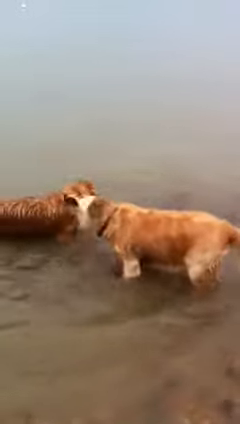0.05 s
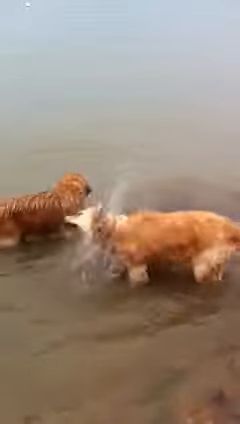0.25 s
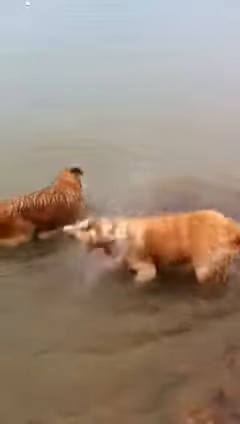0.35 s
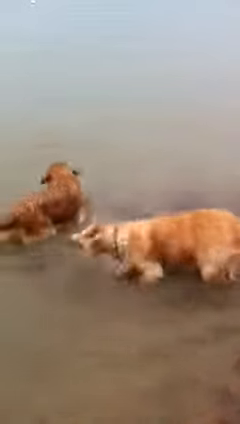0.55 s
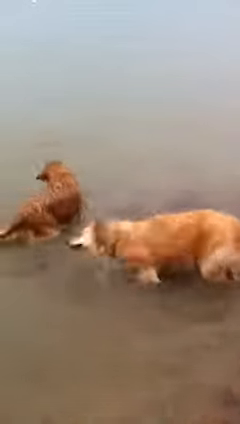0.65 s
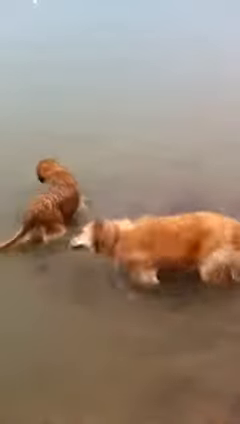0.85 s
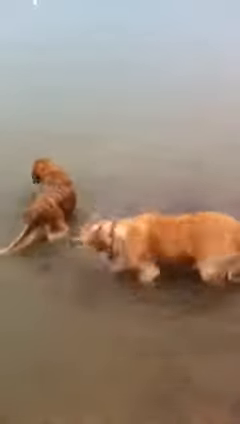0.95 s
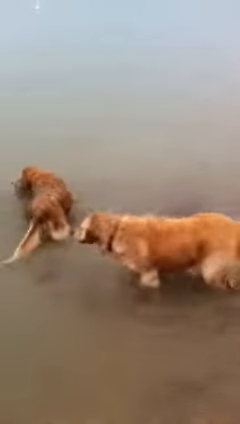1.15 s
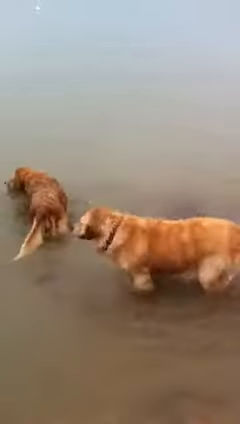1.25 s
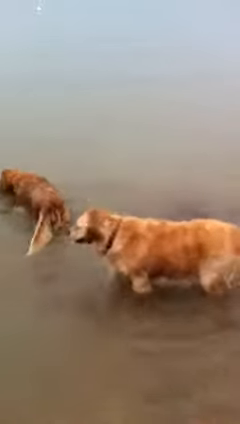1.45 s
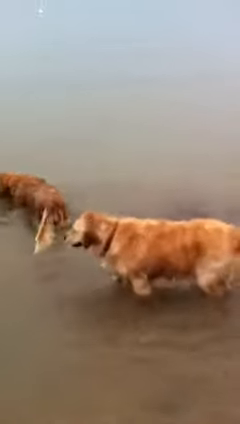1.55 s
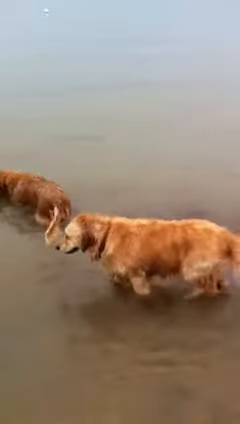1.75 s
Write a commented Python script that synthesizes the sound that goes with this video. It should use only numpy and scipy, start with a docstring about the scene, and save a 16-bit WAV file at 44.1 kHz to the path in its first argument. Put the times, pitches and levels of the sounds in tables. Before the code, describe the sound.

A wet dog shakes its head, ears slapping quickly and spray pattering onto water.

```python
"""A faint shore hiss, a far hum and a few drips, then a sheet of water flies off a wet dog's head.
The dog stands in shallow water a few metres away and shakes: its ears slap about ten times a second,
cracking on wet fur, ringing trapped air and flinging spray. The drops patter back on the water and
ring small bubbles. A faint tone sinks as the shower thins, and a last plop follows."""
import sys
import numpy as np
from scipy import signal
from scipy.fft import rfft, irfft
from scipy.io import wavfile
from scipy.ndimage import uniform_filter1d

SR = 44100
rng = np.random.default_rng(int(sys.argv[2]) if len(sys.argv) > 2 else 0)


def wrap_up_sound(samples):
    """Save the sound to the file named by the first command line argument, as 16-bit audio."""
    columns = np.atleast_2d(samples).T
    # keep every value between -1 and 1, then stretch to whole-number steps
    tamed = np.clip(columns, -1, 1)
    steps = np.round(tamed * 32767).astype(np.int16)
    wavfile.write(sys.argv[1], SR, steps)


N = 79380
TIME, FREQS = np.arange(N) / SR, np.arange(N // 2 + 1) * SR / N
IMPACT_RISE_S = 0.000085
DROPLETS_PER_S, DROPLET_SPREAD_DB = 7000, 2.5


def undb(db):
    return 10 ** (np.asarray(db) / 20)


def unit(x):
    """Scale to rms 1."""
    return x / np.sqrt(np.mean(x ** 2))


def db_at(eq, hz):
    """Read an EQ curve on a log frequency axis."""
    freqs, db = np.array(eq).T
    return np.interp(np.log(np.maximum(hz, 1)), np.log(freqs), db)


def fader(points):
    """Gain over time from points in seconds and dB."""
    return undb(np.interp(TIME, *np.array(points).T))


def colour(x, eq):
    """Shape x with an EQ curve, at rms 1."""
    return unit(irfft(rfft(x) * undb(db_at(eq, FREQS)), N))


def noise(eq):
    return colour(rng.standard_normal(N), eq)


def low_cut(x, hz):
    return signal.sosfilt(signal.butter(3, hz, "high", fs=SR, output="sos"), x)


def burst(peak_s, rise_s, decay_s):
    """Envelope that swells to a peak and dies away."""
    t = TIME - peak_s
    return np.exp(np.minimum(t / rise_s, -t / decay_s))


def clicks(per_s, spread_db):
    """Random clicks of uneven size."""
    hits = rng.random(N) < per_s / SR
    sizes = undb(spread_db * np.minimum(rng.exponential(size=N), 5))
    return hits * sizes * rng.choice([-1, 1], N)


def ring(out, start, hz, db, cycles, glide=0, swell=1 / (2 * np.pi)):
    """Add a short ring to out: a sine whose swell and 1/e decay are counted in cycles."""
    i = max(int(start * SR), 0)
    length = max(min(int(7 * cycles / hz * SR), N - i), 0)
    turns = np.arange(length) * hz / SR
    envelope = np.exp(-turns / cycles) * (1 - np.exp(-turns / swell))
    phase = 2 * np.pi * turns * (1 + glide * turns / hz / 2)
    out[i:i + length] += undb(db) * envelope * np.sin(phase)


# The shore's tone. Each row: frequency in Hz, gain in dB.
SHORE_EQ = [(25, -11), (55, -19), (85, -1.5), (125, 4), (220, 0.5), (320, -1), (600, -1), (1000, -31),
            (2200, -15), (6000, -39), (10000, -23), (16000, -15)]
# The far hum. Each row: centre in Hz, half-width in Hz, level in dB.
HUM_BANDS = [(122.8, 4.3, -72), (176.7, 8.1, -73), (215, 20.6, -71)]


def shore():
    """A steady bed of outdoor hiss, with narrow noise bands wavering as a far hum."""
    out = undb(-65.5) * noise(SHORE_EQ)
    for hz, width, db in HUM_BANDS:
        band = rfft(rng.standard_normal(N)) / (1 + ((FREQS - hz) / width) ** 2)
        out += undb(db) * unit(irfft(band, N))
    return out


# Drips, plops and, at 1.084 s, the bright smack of an ear's rebound. Each row: start in seconds,
# pitch in Hz, ring level in dB, decay in cycles, glide as a fraction of the pitch per second,
# tick level in dB.
WET_HITS = [(0.062, 6900, -59, 14, 6, -70), (0.067, 1378, -69, 25, 0, -75), (.1435, 6460, -57, 9, -2, -73),
            (.1620, 6100, -55, 11, 2, -70), (0.2623, 1320, -38.5, 2.7, 2, -41),
            (.4308, 6200, -33, 7.5, -3, -43), (0.489, 5900, -33.5, 8.8, 15, -48),
            (.4920, 1367, -48, 25, 1.5, -68), (0.523, 6300, -34.5, 8, 9, -40.5),
            (0.5348, 6500, -38, 7.8, 0, -56), (.6220, 1400, -52.5, 6.5, -11, -40.5),
            (.7270, 1440, -37, 4, 9, -46), (.7275, 905, -43.5, 3.7, -6, -60),
            (0.8832, 5800, -29, 3.8, 0, -42), (1.0840, 5150, -32, 5.2, 0, -38),
            (1.2260, 5300, -36, 5.4, -2, -46), (1.2660, 5000, -45, 6, 0, -45.5),
            (1.3150, 746, -42, 3.2, 8, -47), (1.3940, 9000, -44, 11, 4, -63),
            (1.4590, 9140, -40.5, 11, -5, -50), (1.4615, 856, -40, 12.6, 0, -44.5),
            (1.4725, 836, -47.5, 8.9, 1, -56), (1.4850, 724, -54, 8, -8.5, -64),
            (1.5060, 3600, -49, 10, -4, -60), (1.5460, 2300, -55, 8, 0, -66),
            (1.5480, 813, -55, 9.4, 3, -66), (1.623, 696, -53.5, 6, -8, -64),
            (1.6715, 2060, -51, 3.2, -6, -62), (1.6823, 1120, -56.5, 10, -2, -53)]
# The tick of each impact. Each row: frequency in Hz, gain in dB.
TICK_EQ = [(200, -17), (600, 2), (1500, -1), (3000, -1.5), (6000, 1.5), (9000, 0), (12000, -1),
           (16000, -11)]


def drops_and_rebound():
    """Each hit ticks and rings inside a ragged splash; in a drip or plop the ring is a bubble."""
    out, tick = np.zeros(N), noise(TICK_EQ)
    step = 2 ** 0.63  # splash width as a frequency ratio
    for start, hz, db, cycles, glide, tick_db in WET_HITS:
        ring(out, start, hz, db, cycles, glide)
        out += undb(tick_db) * burst(start, IMPACT_RISE_S, decay_s=0.0032) * tick
        splash_eq = [(hz / step**3, -45), (hz / step, -2), (hz, 0), (hz * step, -8), (hz * step**3, -45)]
        out += undb(db - 17) * burst(start + 1 / hz, rise_s=1 / hz, decay_s=9.6 / hz) * noise(splash_eq)
    return out


# The opening swell of water. Each row: time in seconds, level in dB.
SHEET_FADER = [(.17, -70.5), (.205, -51), (.236, -44), (.268, -45), (.295, -66), (.32, -90)]
# Its bright tone. Each row: frequency in Hz, gain in dB.
SHEET_EQ = [(200, -26), (600, -2.5), (1300, -6), (3000, -3), (4500, 0.5), (6600, 4.5), (8000, -1),
            (9500, -0.5), (12000, -4.5), (16000, -5.5)]


def sheet():
    """The first sheet of water leaves the head in a dense rush of droplet clicks."""
    return colour(clicks(DROPLETS_PER_S, DROPLET_SPREAD_DB), SHEET_EQ) * fader(SHEET_FADER)


# Water churned by the shower. Each row: time in seconds, level in dB.
CHURN_FADER = [(0, -73.5), (.19, -68.5), (.25, -56.5), (.32, -62), (.47, -57.5), (.58, -55.5), (.7, -59),
               (.8, -50), (.88, -48), (1.0, -49.5), (1.12, -49), (1.165, -50), (1.22, -49.5), (1.3, -56.5),
               (1.44, -59), (1.55, -66), (1.8, -62.5)]
# The balance of bubble sizes. Each row: pitch in Hz, relative level of one bubble in dB.
BUBBLE_EQ = [(300, -10), (480, 1.5), (800, 6.5), (1300, 11), (1900, 8.5), (2600, 6.5), (4000, 12.5)]
# The dull slosh. Each row: frequency in Hz, gain in dB.
SLOSH_EQ = [(150, -14), (330, 2), (550, 1.5), (900, -5.5), (2000, -30), (16000, -70)]
BIG_BUBBLE_HZ, BUBBLE_CYCLES = 568, 10.64


def churn(count=3000):
    """Bubbles ring and rise in pitch where the shower lands; the surface sloshes when it is heaviest."""
    bubbles, shower = np.zeros(N), fader(CHURN_FADER)
    low_hz, high_hz = BUBBLE_EQ[0][0], BUBBLE_EQ[-1][0]
    heaviness_db = 20 * np.log10(shower / shower.max())
    for when, pitch, size, sustain in rng.random((count, 4)):
        hz = low_hz * (high_hz / low_hz) ** pitch
        cycles = BUBBLE_CYCLES * (.5 + sustain)
        db = db_at(BUBBLE_EQ, hz) + min(-np.log(1 - size), 2)
        if hz < BIG_BUBBLE_HZ:  # big bubbles need a heavy shower
            db += 0.56 * heaviness_db[int(when * N)]
        ring(bubbles, when * N / SR, hz, db, cycles, glide=0.0488 * hz / cycles)
    slosh = undb(-56 + 1.5 * heaviness_db) * noise(SLOSH_EQ)
    return unit(low_cut(bubbles, low_hz)) * shower + slosh


# Ear slaps. Each row: start in seconds, crack level in dB, crack decay in seconds, then pitch in Hz and
# level in dB for the high air pocket, the middle pocket and the ear's hollow, decay of those two
# pockets in cycles, bright ring pitch in Hz and level in dB, thud level in dB, splat level in dB.
EAR_SLAPS = [(.2780, -47, 0.0015, 2520, -32, 1510, -33.5, 920, -25.5, 3.4, 6000, -52, -63, -44.5),
             (.3655, -37, 0.004, 4400, -26, 1316, -30.5, 460, -40, 3.5, 6100, -38.5, -45.5, -44.5),
             (.4581, -41, 0.0059, 5650, -23.5, 1900, -34, 816, -33, 3.5, 5540, -40, -45, -62),
             (.5588, -39, 0.0095, 2160, -25, 1470, -25.5, 600, -46, 2.6, 4970, -41, -60, -49.5),
             (.6590, -41.5, .0065, 1820, -29, 1450, -31, 544, -34, 2.5, 5700, -32.5, -44, -47),
             (.7610, -40, 0.0034, 3260, -28.5, 835, -27, 534, -21, 3.6, 6100, -28.5, -53, -47.5),
             (.8655, -33.5, .0023, 2100, -32, 1300, -38, 422, -30, 5.4, 6200, -36, -56, -46.5),
             (.9710, -34.5, .003, 3430, -14, 2140, -21.5, 610, -28, 3.34, 6630, -24, -37, -50),
             (1.0778, -30.5, 0.0016, 4530, -6.5, 3930, -10, 570, -26, 2.17, 6360, -29, -51, -42),
             (1.1850, -42.5, 0.0082, 2810, -37, 1160, -47, 484, -35, 3, 5900, -35, -43, -51)]
# Tones of the wet fur's crack, the loose skin's splat and the snap of first contact.
# Each row: frequency in Hz, gain in dB.
CRACK_EQ = [(200, -12), (600, 4), (1500, -8), (2800, -1.5), (4500, -1), (6200, 3.5), (7800, -5.5),
            (9200, 0.5), (11500, -9), (16000, -10.5)]
SPLAT_EQ = [(150, -6), (400, 1.5), (700, -2), (1300, -2.5), (2300, 1), (4000, -12), (16000, -38)]
SNAP_EQ = [(3000, -22), (8000, -1), (12000, 3), (16000, 4)]
SPLAT_LAG_S, SLAP_LOW_CUT_HZ = 0.00093, 163  # a low cut thins the deep bass of the slaps


def ears():
    """Each ear swishes in, snaps and cracks on wet fur, rings trapped air, splats and flings water."""
    out, wet_power, splat, snap, air = np.zeros((5, N))
    for (start, crack_db, crack_s, high_hz, high_db, mid_hz, mid_db, hollow_hz, hollow_db,
         cycles, bright_hz, bright_db, thud_db, splat_db) in EAR_SLAPS:
        swish = undb(crack_db - 4.5) * burst(start, rise_s=0.0023, decay_s=0.0023)
        crack = undb(crack_db) * burst(start + IMPACT_RISE_S, IMPACT_RISE_S, crack_s)
        fling = undb(-48) * burst(start, IMPACT_RISE_S, decay_s=0.014)
        wet_power += swish ** 2 + crack ** 2 + fling ** 2
        splat += undb(splat_db) * burst(start + SPLAT_LAG_S, SPLAT_LAG_S, decay_s=0.0062)
        snap += undb(crack_db + 2) * burst(start, IMPACT_RISE_S, decay_s=0.00042)
        # Each slap's rings swell briefly; a bright ring near 6 kHz lasts the most cycles.
        ring(out, start, bright_hz, bright_db, cycles=9.7, swell=2.5)
        ring(out, start, high_hz, high_db, cycles, swell=2.5)
        ring(out, start, mid_hz, mid_db, cycles, swell=2.5)
        ring(out, start, hollow_hz, hollow_db, cycles=0.9, swell=0.61)
        ring(out, start, hz=208, db=thud_db, cycles=0.82)
        ring(air, start - 0.019, hz=40, db=-64, cycles=0.5)  # air pushed ahead of the swing
    for envelope, eq in (np.sqrt(wet_power), CRACK_EQ), (splat, SPLAT_EQ), (snap, SNAP_EQ):
        out += envelope * noise(eq)
    return air + low_cut(out, SLAP_LOW_CUT_HZ)


# Spray leaving the coat and landing. Each row: time in seconds, level in dB.
SPRAY_FADER = [(0, -90), (.175, -82), (.3, -63), (.345, -55), (.41, -53.5), (.47, -48.5), (.52, -49),
               (.6, -52), (.71, -51.5), (.8, -48), (.89, -48.5), (1.03, -48), (1.14, -51), (1.25, -53.5),
               (1.34, -60.5), (1.52, -62.5), (1.8, -64.5)]
# Tones of the fine mist and of the drops that stand out. Each row: frequency in Hz, gain in dB.
MIST_EQ = [(90, -54), (300, -2), (1000, -7.5), (2000, -3.5), (2800, -3), (4000, 0), (6200, 3), (7700, -3),
           (9000, 0), (11500, -5), (16000, -7)]
CRACKLE_EQ = [(1000, -28), (3000, 3), (5500, 1), (9000, 6), (16000, -12)]
SURGE_DB, SURGE_LAG_S = 1, 0.027


def spray():
    """Thousands of tiny droplets click under a sparser crackle, surging just after each slap."""
    mist = colour(clicks(DROPLETS_PER_S, DROPLET_SPREAD_DB), MIST_EQ)
    crackle = undb(-10.5) * colour(clicks(per_s=260, spread_db=-2.5), CRACKLE_EQ)
    slap_times = [row[0] for row in EAR_SLAPS]
    swings = np.interp(TIME - SURGE_LAG_S, slap_times, np.arange(len(slap_times)))
    surge = undb(SURGE_DB * np.cos(2 * np.pi * swings))
    return (mist + crackle) * fader(SPRAY_FADER) * surge


# The trickle's swell and fade. Each row: time in seconds, level in dB.
TRICKLE_FADER = [(0, -91), (.2, -87), (.4, -72), (.8, -56), (1.2, -59), (1.4, -79), (1.8, -84)]


def trickle(count=420, low_hz=3600, high_hz=15500):
    """Scattered bigger drops tick through the shower as short, high pings."""
    out = np.zeros(N)
    for when, pitch, size in rng.random((count, 3)):
        hz = low_hz * (high_hz / low_hz) ** pitch
        db = 3 * min(-np.log(1 - size), 3)
        ring(out, when * N / SR, hz, db, cycles=4)
    return unit(out) * fader(TRICKLE_FADER)


# The falling tone. Each row: time in seconds, pitch in Hz, level in dB.
WHISTLE_PATH = [(1.22, 1980, -80), (1.245, 1975, -51), (1.28, 1930, -84), (1.385, 1830, -59),
                (1.419, 1730, -64), (1.46, 1660, -84)]


def whistle(waver_hz=26):
    """A faint wavering tone sinks as the shower thins."""
    times, hz, db = np.array(WHISTLE_PATH).T
    waver = unit(uniform_filter1d(rng.standard_normal(N), size=200))
    pitch = np.interp(TIME, times, hz) + waver_hz * waver
    envelope = np.interp(TIME, times, undb(db), left=0, right=0)
    return envelope * np.sin(2 * np.pi * np.cumsum(pitch) / SR)


def scene():
    """The shake and its shower over the shore, in mono."""
    mix = shore() + drops_and_rebound() + sheet() + churn() + ears() + spray() + trickle() + whistle()
    return mix[None]


def record(dry):
    """A steep low-pass trims the treble above 16.1 kHz."""
    return signal.sosfilt(signal.ellip(10, .1, 70, 16100, fs=SR, output="sos"), dry)


dry = scene()
out = record(dry)
wrap_up_sound(out)
```